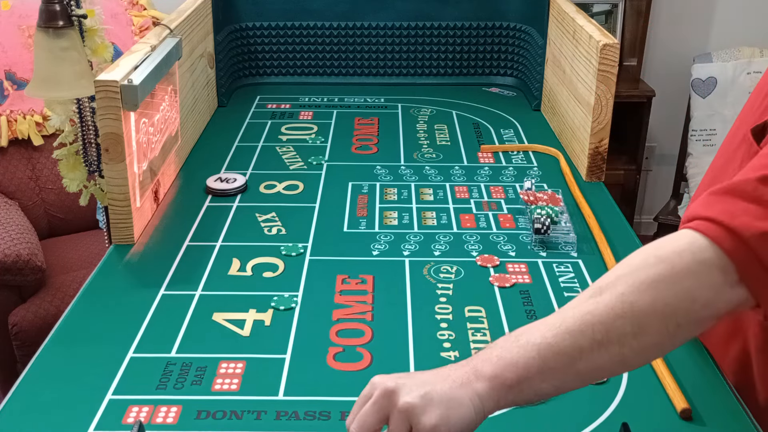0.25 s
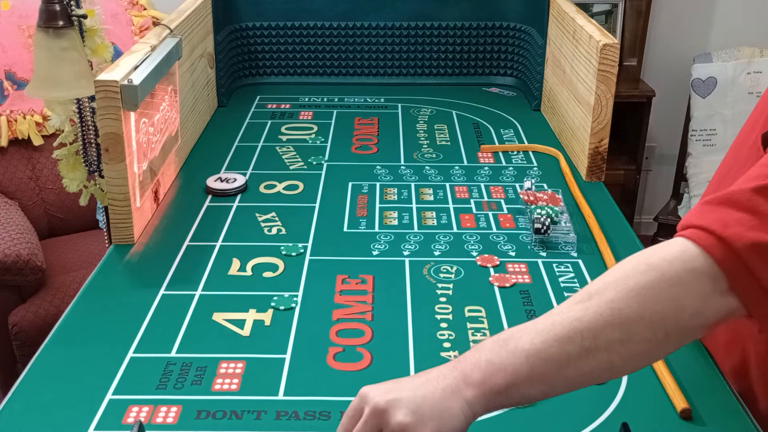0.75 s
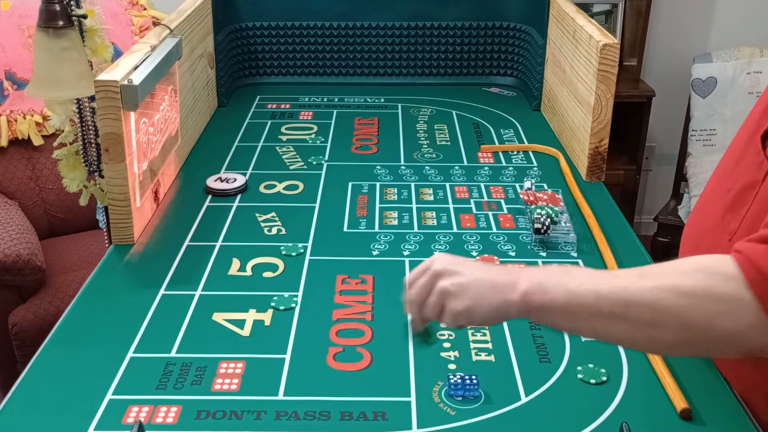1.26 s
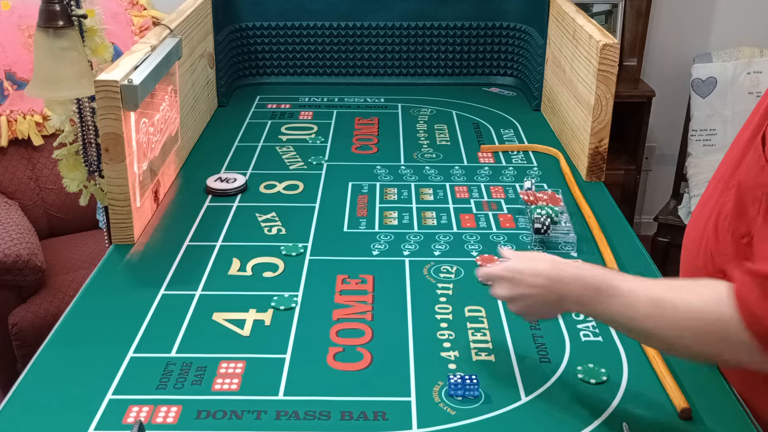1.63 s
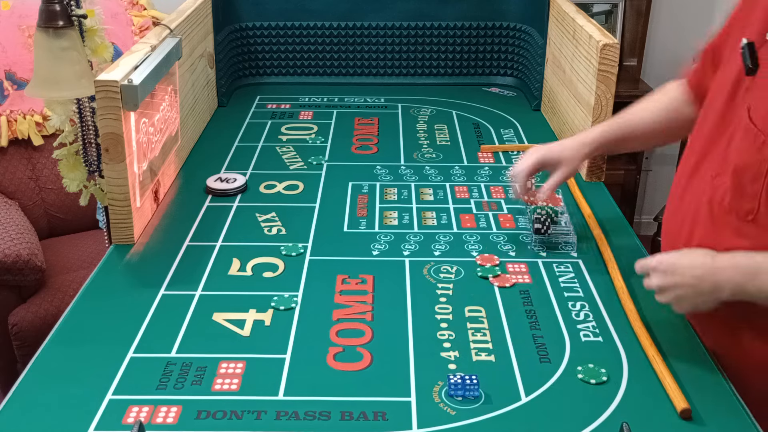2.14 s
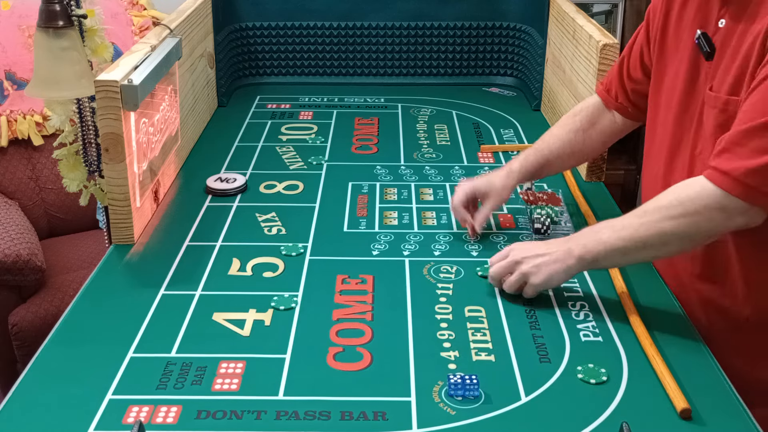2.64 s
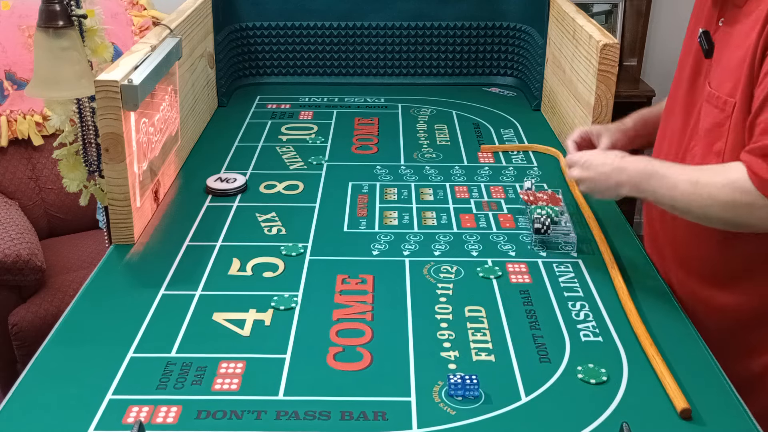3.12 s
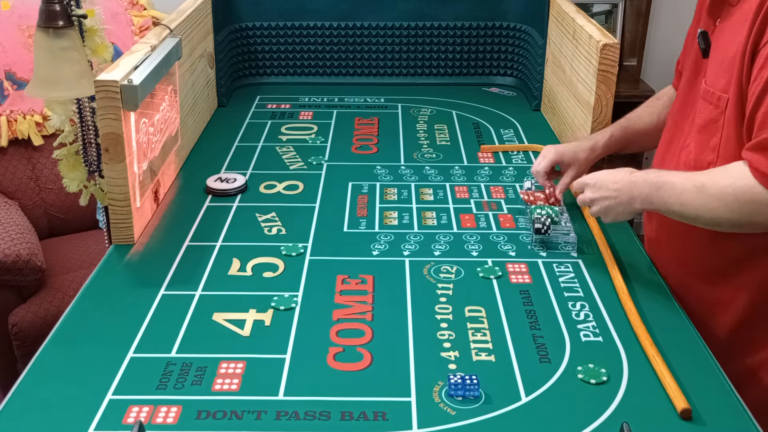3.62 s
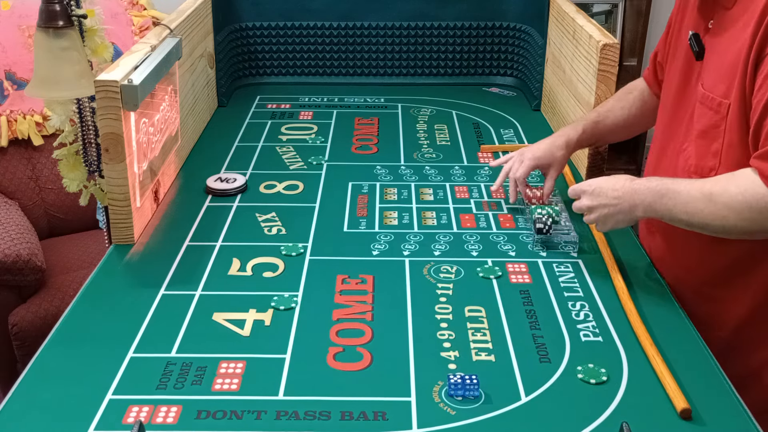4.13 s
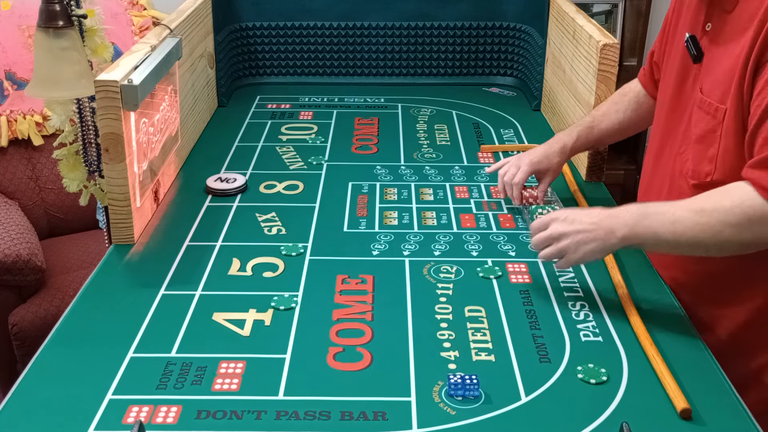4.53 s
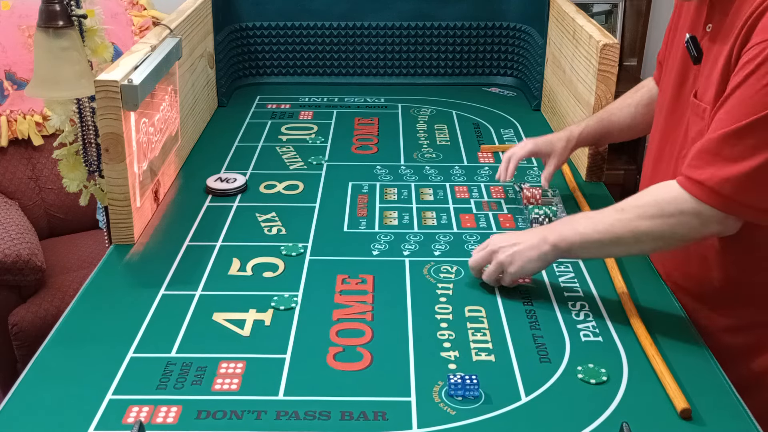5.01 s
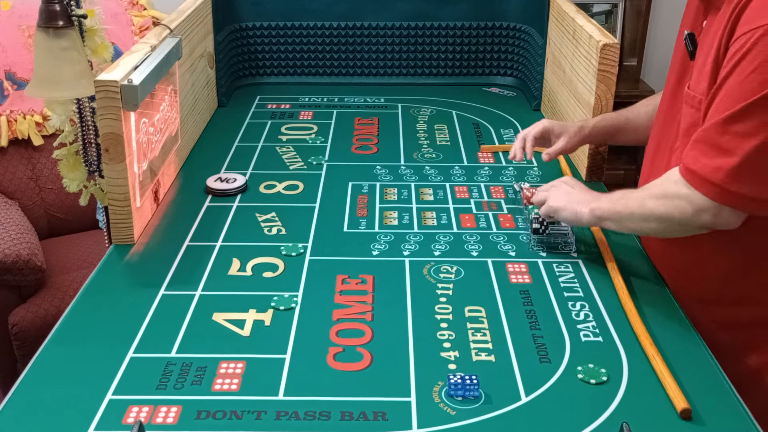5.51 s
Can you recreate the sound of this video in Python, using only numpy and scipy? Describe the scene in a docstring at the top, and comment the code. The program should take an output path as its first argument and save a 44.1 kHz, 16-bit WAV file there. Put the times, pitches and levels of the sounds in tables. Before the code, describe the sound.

Hard plastic chips handled on a felt-covered wooden table. Faint dull touches lead to a bright double clack and chatter, a pause with a soft low thump and tiny click, then repeated crisp hollow clacks mixed with brushing cloth, ending on two close stacking knocks. One near microphone, short room echo, very low background hiss.

```python
"""Low, soft thumps of a padded gaming table, chips sliding on its cloth and loose chips jostling in the hand;
then chips are set down and stacked, scrape and whistle, and near the end the table gives one low creak.
Blows are damped modes of table, stack, discs and rims; slides are shaped noise, scrapes, faint lingering
rings and whistles are resonances fed with noise, the creak one swelling sine. All is mono, as at one
microphone in a small room: direct sound first, then a room echo on blows and thumps, over quiet air."""
import sys
import numpy as np
from scipy import signal
from scipy.fft import rfft, irfft
from scipy.io import wavfile
from scipy.ndimage import uniform_filter1d, minimum_filter1d

SR = 44100
rng = np.random.default_rng(int(sys.argv[2]) if len(sys.argv) > 2 else 0)


def output_pcm(signal):
    """Save a mono or channel-first signal as 16-bit PCM at the path in sys.argv[1].

    Samples are clipped to [-1, 1] before scaling.
    """
    pcm = np.clip(np.atleast_2d(signal).T, -1, 1) * 32767
    wavfile.write(sys.argv[1], SR, np.round(pcm).astype(np.int16))


N = 254366  # length in samples

# Quiet air of the room. Each row: frequency in Hz, relative density in dB per Hz.
AIR_SPECTRUM = [(15, -21.5), (25, 1.5), (53, -3), (285, -6), (677, -14.5), (1560, -17), (2220, -19.5),
                (4740, -17.5), (5280, -22.5), (14800, -26), (16000, -33.5)]
AIR_DB = -67.5  # rms level

# A hand pushes chips over the cloth. Each row: start in seconds, length in seconds,
# rub level in dB, fizz level in dB, both before the layer's trim.
STROKES = [(0, 0.26, -57.5, -85), (1.694, 0.6, -66, -78.5), (2.505, 0.091, -60, -58),
           (2.598, 0.19, -47.5, -55), (4.179, 0.16, -45, -80), (4.47, 0.23, -47, -72),
           (4.701, 0.29, -55, -69.5), (5.068, 0.082, -50, -52.5), (5.217, 0.037, -64, -57.5)]
STROKE_ATTACK_S, STROKE_T60_S = 0.04, 0.49
# Dull rub of the hand. Each row: frequency in Hz, relative density in dB per Hz.
RUB_SPECTRUM = [(40, -19.5), (120, -13), (220, -4.5), (400, 5.5), (800, 1), (1400, 0.5), (2200, -9.5),
                (3200, -14), (4400, -14), (6000, -36), (12000, -34)]
# Fine fizz of the weave. Each row: frequency in Hz, relative density in dB per Hz.
FIZZ_SPECTRUM = [(2500, -15), (4400, 8), (5600, -9.5), (7000, 2.5), (8500, -7.5), (10300, 2.5),
                 (11800, -4.5), (13700, 10), (16000, -6.5)]

# Low, soft thumps and low rings; close rows sound as one bump.
# Each row: start in seconds, level of the direct sound in dB, nominal pitch in Hz.
THUMPS = [(0.001, -46, 255), (0.165, -46.5, 248), (2.346, -59, 51.3), (2.434, -41.5, 183),
          (2.455, -49, 106), (2.461, -37, 55.7), (2.472, -47.5, 181.2), (4.364, -40, 336),
          (5.018, -49.5, 62.7), (5.303, -50.5, 317)]

# Modes of the things struck. Each row: nominal frequency in Hz, relative level in dB, t60 in seconds.
TABLE_MODES = [(60, -35, 0.0093), (125.2, -21.5, 0.15), (188, -7, 0.053), (308.4, 0.5, 0.056),
               (393.8, -1, 0.12), (518.5, 9, .04)]
STACK_MODES = [(775, 5.5, 0.0044), (882, -6.5, 0.015), (1129.5, -3.5, 0.021), (1444, 1, 0.02),
               (1815, 0, 0.012), (2237, -10, 0.016)]
DISC_MODES = [(2520, -3.5, 0.0073), (3043, -2, 0.0088), (3550, -2.5, 0.0084), (3983, 2, 0.0065),
              (4510, -10.5, 0.012), (4900, -3, 0.0049)]
RIM_MODES = [(5593, -4.5, 0.0031), (6838, 8, 0.0033), (6840, 1.5, 0.0079), (10120, -9.5, 0.0073),
             (13100, -18.5, 0.03)]

# Colour of the room's echo. Each row: frequency in Hz, relative level in dB.
ECHO_COLOUR = [(100, -6), (350, 1), (800, 7), (1600, -2), (4000, 0), (7000, -2), (15000, 3)]
# Decay of the echo. Each row: frequency in Hz, factor on the room's t60.
ECHO_LIFE = [(100, 2.1), (400, 0.53), (1200, 0.88), (4000, 0.86), (7000, 0.82), (15000, 0.56)]
ROOM_T60_S = 0.27  # for the chips, before the factors of ECHO_LIFE

# Wooden walls of the table, ringing on after the chips' blows.
# Each row: frequency in Hz, level at resonance in dB before trim, t60 in seconds.
WALL_MODES = [(201, -6, 0.13), (303, -6, 0.18), (380, -7.5, 0.6), (576, -11, 0.8), (740, -13.5, 0.55),
              (898, -2, 0.17), (1022, -9, 0.66), (1170, -14, 0.41), (1834, -8.5, 0.06), (1800, -9.5, 0.23),
              (3180, -7, 0.14), (3950, -7, 0.23), (7030, -7, 0.12)]

# Loose chips jostle in the hand, settle after a drop, or swell softly into a muffled set-down.
# Each row: start in seconds, length in seconds, first knock in dB before scatter and trim,
# fade in dB per second (negative swells), knocks per second, hardness in dB,
# note of the stack in Hz, table thud against the clack in dB.
JOSTLES = [(0.002, 0.38, -50, 29.5, 21, -22.5, 957, 2), (0.622, .04, -66, -330, 217, -43, 1495, -6.5),
           (0.756, .025, -54, -2, 200, -41, 840, 9), (1.118, 0.032, -54, -380, 206, -30, 588, 2),
           (1.638, .23, -19, 117.5, 136, -33.5, 1103, -3), (2.6, .035, -49.5, -400, 182, -25, 725, 0),
           (2.856, .025, -45, -100, 200, -48, 990, 7), (3.737, 0.043, -24.5, -92, 40, -33.5, 1350, -12),
           (4.132, 0.072, -56, -330, 144, -41, 580, -3), (4.503, 0.09, -44.5, -27, 88, -45, 1823, 0),
           (5.123, 0.032, -39.5, 62, 57, -25, 1734, -22.5), (5.676, .09, -25, 150, 87, -38, 1230, -7.5)]

# A chip or a small pile is put down: it touches with its rim, then falls flat a moment later.
# Each row: start in seconds, touch level in dB before trim, touch hardness in dB, fall in seconds,
# landing level in dB before trim, landing hardness in dB, note of the stack in Hz,
# table thud against the clack in dB, disc ring in dB, added to the share that follows hardness.
PLACINGS = [(0.638, -48, -42, 0.014, -44.5, -34, 820, -4, -6),
            (0.741, -48, -40, .012, -43.5, -18.5, 830, 3, -7),
            (1.13, -38.5, -30, 0.023, -33.5, -18, 627, 0.5, 2),
            (1.619, -13, -20, 0.011, -4.5, -35.5, 1400, -10, 1.5),
            (1.705, -18, -12.5, .035, -27.5, -13.5, 970, -10, 1),
            (1.934, -34.5, -31, .015, -30, -29, 1100, -13.5, 8.5),
            (2.426, -55.5, -17, 0.02, -52, -23, 1004, 5, 0),
            (2.612, -40, -15, 0.028, -23.5, -27.5, 1650, -7, -3),
            (2.851, -45, -37.5, 0.017, -43, -44, 1054, 4.5, 10),
            (3.232, -49.5, 12, 0.0067, -48, 14, 1650, -27, -3),
            (3.248, -39.5, -1.5, 0.0046, -42.5, 2.5, 1750, -31.5, -2.5),
            (3.68, -5, -23, 0.025, -11.5, -12.5, 1750, -15, 0),
            (3.799, -11.5, -24.5, .024, -29, -18.5, 1036, -12.5, -0.5),
            (3.842, -18.5, -7.5, .025, -24.5, -21, 1120, -12, 3),
            (4.184, -21, -29.5, 0.012, -9.5, -21, 560, -10.5, -1),
            (4.222, -17.5, -5, 0.0031, -17, -5, 580, -12, 0.5),
            (4.361, -37, -24, .018, -44, -30, 556, -7.5, 10),
            (4.473, -51.5, -6.5, .015, -39.5, -25.5, 1250, -0.5, 5),
            (4.582, -20, -41, 0.011, -4, -36.5, 1918, -19, 9.5),
            (4.995, -53, -9, 0.018, -47.5, -16.5, 1440, -18, 4),
            (5.061, -37.5, -25, 0.017, -34.5, -33.5, 525, -9, 0.5),
            (5.096, -9, -33, 0.019, -23.5, -18.5, 1843, -17.5, 8.5),
            (5.284, -50, -27, 0.018, -75, -45.5, 930, -2, -8),
            (5.598, -8, -13.5, .015, -15.5, -22, 1800, -8, 6),
            (5.643, -5.5, -22.5, 0.022, -26, -22, 1830, -12.5, 3)]
RING_SHARE = 0.7  # hardness is the rim's tick against the clack; the discs' ring follows this share of it

# Scrapes, and faint rings that linger after the blows.
# Each row: start in seconds, length in seconds, level in dB, starting ring in Hz.
SCRAPES = [(0.746, .006, -56, 4670), (1.157, 0.018, -52.5, 7100), (1.255, .05, -63, 4630),
           (1.702, .008, -21.5, 4350), (1.741, .08, -42.5, 4580), (1.848, 0.013, -38, 4330),
           (2.002, .3, -70, 1490), (2.592, 0.19, -63, 4520), (2.822, 0.026, -49.5, 4275),
           (3.239, 0.0085, -34.5, 4250), (3.241, 0.0087, -33.5, 6760)]
# Their resonances. Each row: multiple of the ring, width in Hz, relative level in dB.
SCRAPE_MODES = [(1, 300, 6.5), (1.58, 385.4, -8), (2.349, 596, -25)]
SCRAPE_ATTACK_S, SCRAPE_T60_S = 0.0032, 0.17
SCRAPE_SAG_PER_S = 0.38  # share of the starting pitch lost per second

# The weave sings thinly under a sliding chip, one curve a slide.
# Each row of a curve: time in seconds, upper pitch in Hz before waver, level in dB before flutter and trim.
WHISTLES = [
    [(4.48, 14636, -84), (4.506, 14953, -76), (4.54, 15257, -85)],
    [(4.66, 15669, -77), (4.716, 15469, -79), (4.746, 15100, -68), (4.848, 14592, -66),
     (4.944, 14700, -70.5), (4.96, 14850, -61), (5.06, 14700, -86)],
]
LOWER_TONE = 0.715  # second tone as a multiple of the upper pitch

BAND_LIMIT_HZ = 15900


def gain_of(db):
    """Decibels to amplitude."""
    return 10 ** (np.asarray(db) / 20)


def evened(x):
    """Scales to rms 1."""
    return x / np.sqrt(np.mean(x ** 2) + 1e-20)


def read(points, hz):
    """Reads a (Hz, value) table on a log-frequency axis."""
    f, value = np.transpose(points)
    return np.interp(np.log(hz + 1), np.log(f + 1), value)


def add(mix, s, sound):
    """Mixes a sound in at time s."""
    part = mix[max(round(s * SR), 0):][:len(sound)]
    part += sound[:len(part)]


def coloured(x, spectrum):
    """Shapes x by a spectrum and evens it to rms 1."""
    shape = gain_of(read(spectrum, np.fft.rfftfreq(len(x), 1 / SR)))
    return evened(irfft(rfft(x) * shape, len(x)))


def wander(rate):
    """A random curve of straight segments that turns about rate times a second."""
    return np.interp(np.arange(N) / SR * rate, np.arange(4096), rng.standard_normal(4096))


def swell(t, length, attack_s, t60):
    """Attack, hold and exponential release."""
    return np.clip(t / attack_s, 0, 1) * gain_of(-60 * np.maximum(t - length, 0) / t60)


def unit_blow(x):
    """Scales a blow so that its energy equals 20 ms at rms 1."""
    return x * np.sqrt(0.02 * SR / np.sum(x ** 2))


def ring(modes, t, spread, rise):
    """Damped modes, a little different at each blow; rise sets how gradually the sound starts."""
    hz, db, t60 = np.transpose(modes)[:, :, None]
    detune, phase = rng.uniform(-1.188, 1, (2, len(modes), 1))
    decay = gain_of(db - 60 * t / t60)
    waves = decay * np.sin(2 * np.pi * hz * (1 + spread * detune) * t + np.pi * phase)
    return unit_blow(waves.sum(0) * (1 - np.exp(-t / rise)))


def resonate(x, hz, width):
    """A resonance that follows the curve hz, applied twice for steep sides, at rms 1."""
    turn = np.exp(2j * np.pi * np.cumsum(hz) / SR)
    r = np.exp(-np.pi * width / SR)
    # Turn the wanted pitch down to 0 Hz, low-pass there, and turn it back.
    return evened((turn * signal.lfilter([1], [1, -2 * r, r * r], x / turn)).real)


def all_round(x, size):
    """The spectrum that a blow sends in all directions: its narrow notches fill in."""
    total = np.cumsum(abs(rfft(x, size)) ** 2)
    k = np.arange(len(total))
    reach = 0.025 * k + 1  # half-width of the average, in bins
    power = abs(np.interp(k + reach, k, total) - np.interp(k - reach, k, total))
    return np.sqrt(power / (2 * reach))


def room(x, t60, wet_db=-3, early_db=3, early_s=0.0032, gap_s=0.0054):
    """Direct sound, then dense early echoes from the table's walls, then the room's tail."""
    size = 24576
    taps = rng.choice([-1., 1.], size) * (rng.random(size) < 0.1)
    # Each band of the scattered echoes gets its own colour and decay.
    hz, t, bands = signal.stft(taps, SR, nperseg=256)
    life = np.maximum(t60, 0.05) * read(ECHO_LIFE, hz)[:, None]
    bands = bands * gain_of(read(ECHO_COLOUR, hz)[:, None] - 60 * t / life)
    tail = signal.istft(bands, SR, nperseg=256)[1][:size]

    t = np.arange(size) / SR
    tail *= 1 + gain_of(early_db) * np.exp(-t / early_s)
    tail *= 1 - np.exp(-(t / gap_s) ** 2)
    heard = irfft(rfft(tail / np.linalg.norm(tail), 2 * size) * all_round(x, 2 * size))[:size]
    heard *= gain_of(wet_db) * (1 - np.exp(-2 * t / gap_s))
    add(heard, 0, x)
    return heard


def air():
    """Shaped steady noise for the quiet air of the room."""
    return gain_of(AIR_DB) * coloured(rng.standard_normal(N), AIR_SPECTRUM)


def sliding(rub_db=-2, fizz_db=-2, grain_db=3, patchy_db=4.0, rest_rub_db=-71, rest_fizz_db=-82):
    """Tiny slips on the cloth: a dull rub of the hand and a fine fizz of the weave,
    over a steady, faint background hiss."""
    t = np.arange(N) / SR
    rub, fizz = gain_of(rest_rub_db), gain_of(rest_fizz_db)  # background levels before trim
    lead = STROKE_ATTACK_S / 2  # the stroke is half risen at its start time
    for start, length, rub_level, fizz_level in STROKES:
        push = swell(t - start + lead, length + lead, STROKE_ATTACK_S, STROKE_T60_S)
        rub = np.maximum(rub, gain_of(rub_level) * push)
        fizz = np.maximum(fizz, gain_of(fizz_level) * push)
    slips = rng.standard_normal((2, N))
    slips *= gain_of(grain_db * wander(500) + patchy_db * wander(33))
    rubbing = gain_of(rub_db) * rub * coloured(slips[0], RUB_SPECTRUM)
    fizzing = gain_of(fizz_db) * fizz * coloured(slips[1], FIZZ_SPECTRUM)
    return rubbing + fizzing


def thumps(t60=0.089, echo_s=0.34):
    """Low, soft thumps and low rings, each a pair of damped modes heard in the room."""
    out, t = np.zeros(N), np.arange(8192) / SR
    for s, db, hz in THUMPS:
        thump = ring([(hz, 0, t60), (1.46 * hz, -8, t60 / 2)], t, spread=0.028, rise=0.0057)
        add(out, s, gain_of(db) * room(thump, echo_s, wet_db=2.5))
    return out


def rattle(x, length_s, first=0.57, count=5):
    """A chip lands on its rim and chatters a few times before it lies flat."""
    place, size = rng.random((2, count))
    out = first * x
    for k in range(count):
        strength = (0.5 + size[k]) * (1 - k / count)
        add(out, length_s * (k + place[k]) / count, strength * x)
    return unit_blow(out)


def contact(thud_db, clack_db, ring_db, tick_db, note_hz, rattle_s=0.006):
    """One blow: the padded table, the hollow note of the stack, the discs and their hard rims."""
    t = np.arange(4096) / SR
    thud = ring(TABLE_MODES, t, spread=0.12, rise=0.0031)
    note = ring([(note_hz, 0, 0.02)], t, spread=0.0011, rise=0.00081)
    stack = ring(STACK_MODES, t, spread=0.13, rise=0.00071)
    clack = unit_blow(stack + gain_of(-1.0) * note)
    disc = rattle(ring(DISC_MODES, t, spread=0.025, rise=0.0004), rattle_s)
    # A short burst of bright noise roughens the rim's tick.
    crack = unit_blow(np.diff(rng.standard_normal(len(t)), prepend=0) * np.exp(-t / 0.0018))
    rim = ring(RIM_MODES, t, spread=0.011, rise=0.00012)
    tick = rattle(rim + gain_of(-7.5) * crack, rattle_s)
    return gain_of([thud_db, clack_db, ring_db, tick_db]) @ np.array([thud, clack, disc, tick])


def knock(hardness_db, note_hz, thud_db, added_ring_db=0):
    """One contact in the room: the harder it is, the more the discs ring and the rims tick."""
    ring_db = RING_SHARE * hardness_db + added_ring_db
    return room(contact(thud_db, 0, ring_db, hardness_db, note_hz), ROOM_T60_S)


def jostling(level_db=-4, uneven=0.17, scatter_db=2, count=2):
    """Uneven runs of small knocks that swell or fade, passed round among a few chips."""
    out = np.zeros(N)
    for start, length, db, fade, rate, hardness_db, hz, thud_db in JOSTLES:
        knocks = [knock(hardness_db, hz, thud_db) for _ in range(count)]
        for k, (slip, size, which) in enumerate(rng.uniform(-1, 1, size=(64, 3))):
            t = abs(k + uneven * slip) / rate
            if t < length:
                # "which" picks both the chip and the polarity of its knock.
                strength = np.sign(which) * gain_of(db - fade * t + scatter_db * size)
                add(out, start + t, strength * knocks[int(abs(which) * count)])
    return gain_of(level_db) * out


def walls(x, level_db=-1):
    """Lightly damped modes of the wood, set off by the chips and added to them."""
    t = np.arange(16384) / SR
    hz, db, t60 = np.transpose(WALL_MODES)[:, :, None]
    damping = np.log(1000) / t60 / SR  # per sample; sets unit gain at resonance
    modes = 2 * damping * gain_of(db - 60 * t / t60) * np.sin(2 * np.pi * hz * t)
    return x + gain_of(level_db) * signal.fftconvolve(x, modes.sum(0))[:N]


def chips(level_db=-4, lag_s=0.0014):
    """Each placing is two knocks: the rim touches, then the face lands."""
    out = np.zeros(N)
    for s, touch_db, touch_hard, fall_s, land_db, land_hard, *stack in PLACINGS:
        add(out, s + lag_s, gain_of(touch_db) * knock(touch_hard, *stack))
        add(out, s + lag_s + fall_s, gain_of(land_db) * knock(land_hard, *stack))
    return gain_of(level_db) * out


def scrape(grain_db=4):
    """Scrapes and faint lingering rings: grainy noise feeds resonances whose pitch sinks."""
    out, t = np.zeros(N), np.arange(32768) / SR
    for start, length, db, ring_hz in SCRAPES:
        hz = ring_hz * (1 - SCRAPE_SAG_PER_S * np.minimum(t, length))
        grains = rng.standard_normal(len(t)) * gain_of(grain_db * wander(160)[:len(t)])
        rings = sum(gain_of(mode_db) * resonate(grains, k * hz, width) for k, width, mode_db in SCRAPE_MODES)
        envelope = swell(t, length, SCRAPE_ATTACK_S, SCRAPE_T60_S)
        add(out, start, gain_of(db) * envelope * evened(rings))
    return out


def whistle(width_hz=90, partner_db=-12, level_db=1, waver_hz=30, flutter_db=2):
    """A chip crossing the threads makes two thin tones that follow its uneven speed."""
    s, hz, db = np.concatenate(WHISTLES).T
    t = np.arange(N) / SR
    moving = sum((t > curve[0][0]) * (t < curve[-1][0]) for curve in WHISTLES)
    slips = rng.standard_normal(N)
    pitch = np.interp(t, s, hz) + waver_hz * wander(45)
    upper = resonate(slips, pitch, width_hz)
    lower = resonate(slips, LOWER_TONE * pitch, width_hz)
    level = gain_of(np.interp(t, s, db) + level_db + flutter_db * wander(45))
    return level * moving * (upper + gain_of(partner_db) * lower)


def creak(s=5.379, hz=422, db=-32, length_s=0.01):
    """A short low sine that swells and fades as weight shifts on the table."""
    t = np.arange(N) / SR - s
    envelope = np.exp(-np.hypot(t / length_s, 1) * 2 + 2)
    return gain_of(db) * envelope * np.sin(2 * np.pi * hz * t)


def suppress_tails(x, below_db=18, slope=0.35, depth_db=9, forget_db_per_s=70):
    """Echo suppression: sound that has sunk far under the last peak is turned down further."""
    level = 10 * np.log10(abs(uniform_filter1d(x ** 2, size=661)) + 1e-12)  # over 15 ms
    fall = np.arange(N) / SR * forget_db_per_s
    held = np.maximum.accumulate(level + fall, axis=-1) - fall  # a peak level that sinks steadily
    cut_db = np.clip(slope * (held - level - below_db), 0, depth_db)
    return x * gain_of(-uniform_filter1d(cut_db, size=441))


def scene():
    """Chips, thumps, cloth and quiet air at one microphone; the chips also set off the wooden walls."""
    blows = walls(chips() + jostling())
    low_thumps = thumps()
    slides = scrape() + sliding() + whistle()
    return (blows + low_thumps + slides + creak() + air())[None]


def record(dry):
    """A fast limiter holds the loudest clacks at full scale; then echo suppression and the band limit."""
    allowed = minimum_filter1d(1 / np.maximum(abs(dry), 1), size=45)
    limited = dry * uniform_filter1d(allowed, size=45)
    low_pass = signal.firwin(401, BAND_LIMIT_HZ, window=("kaiser", 9), fs=SR)
    return signal.oaconvolve(suppress_tails(limited), low_pass[None], "same")


dry = scene()
out = record(dry)
output_pcm(out)
```